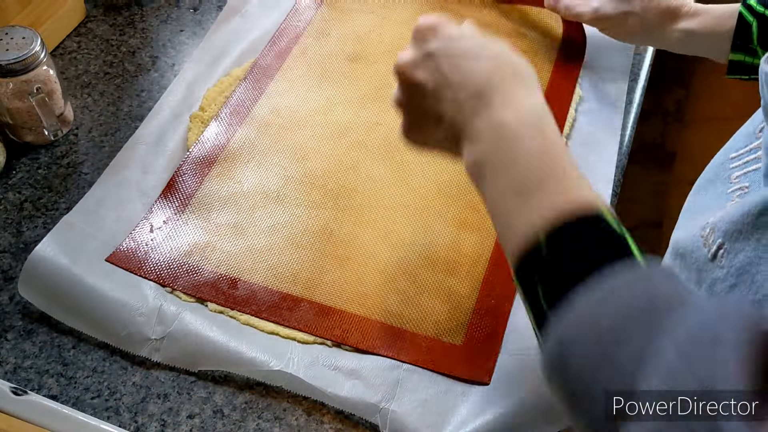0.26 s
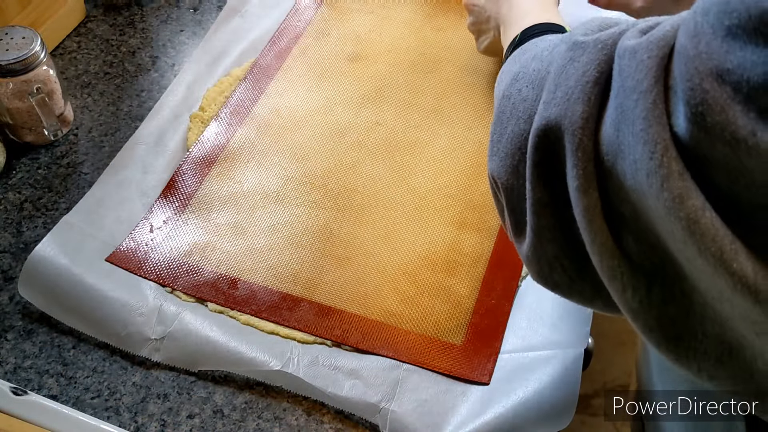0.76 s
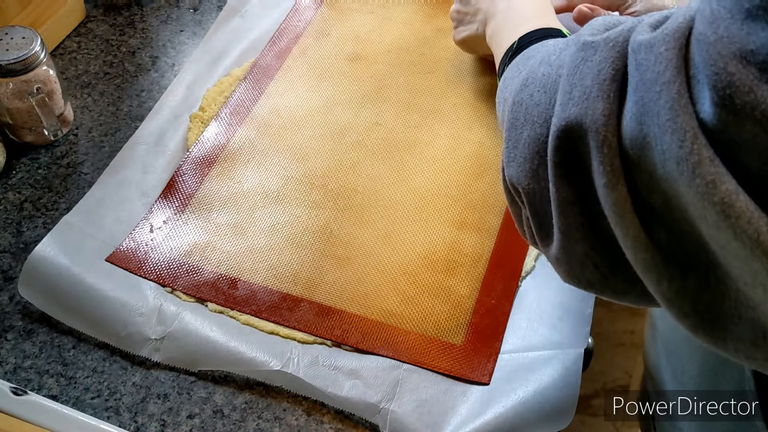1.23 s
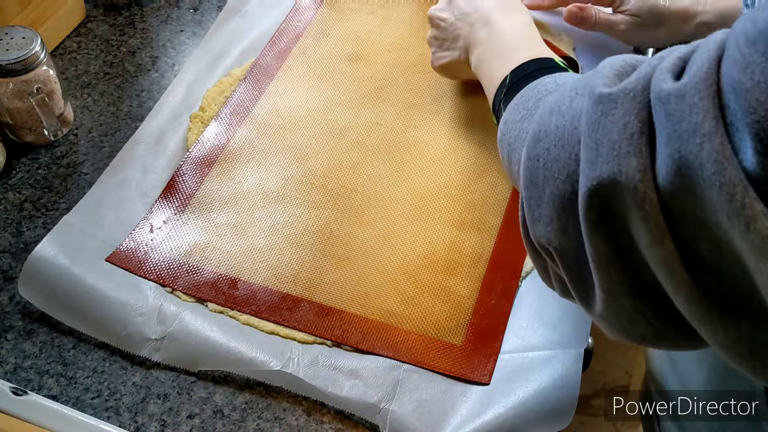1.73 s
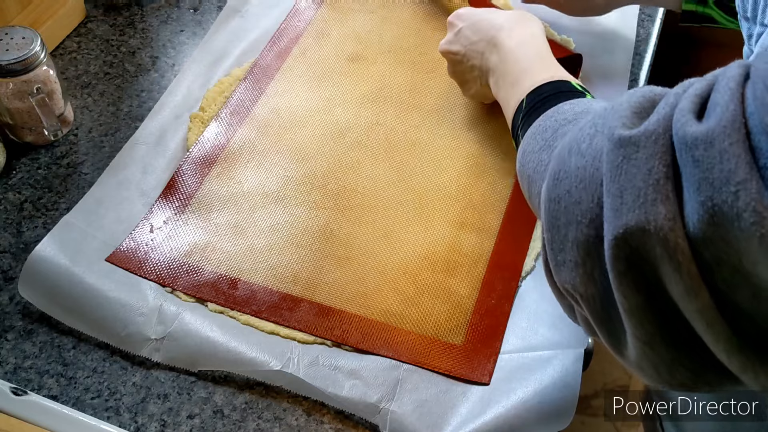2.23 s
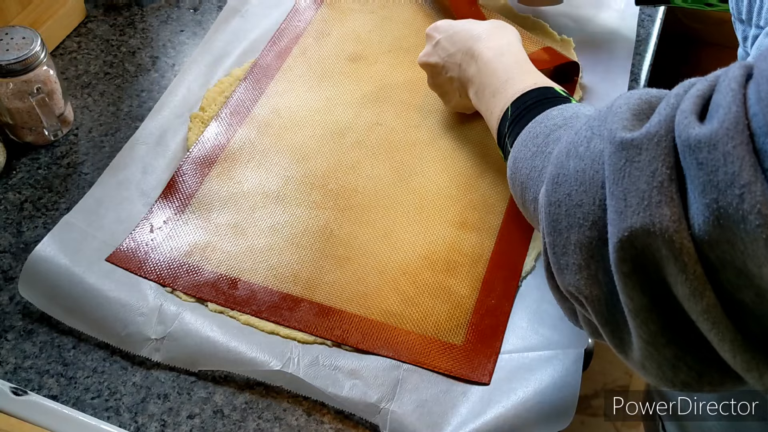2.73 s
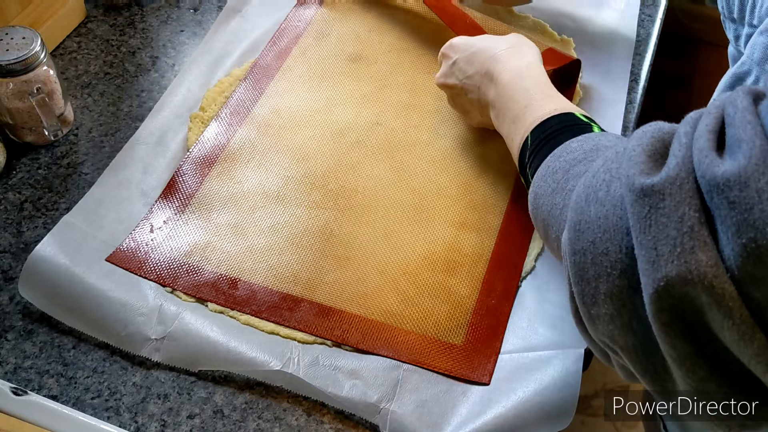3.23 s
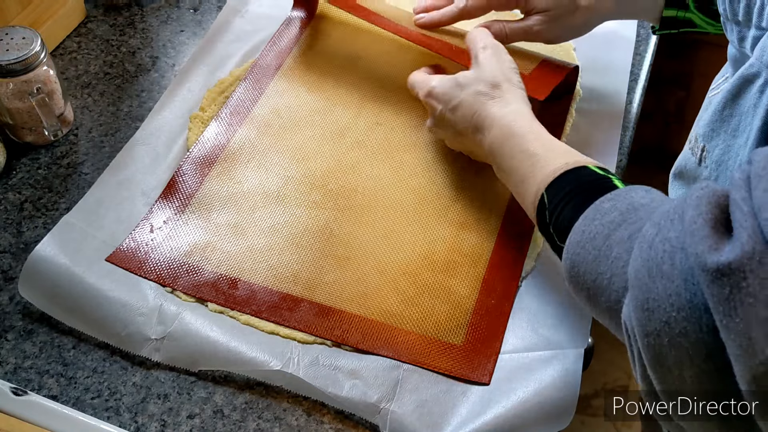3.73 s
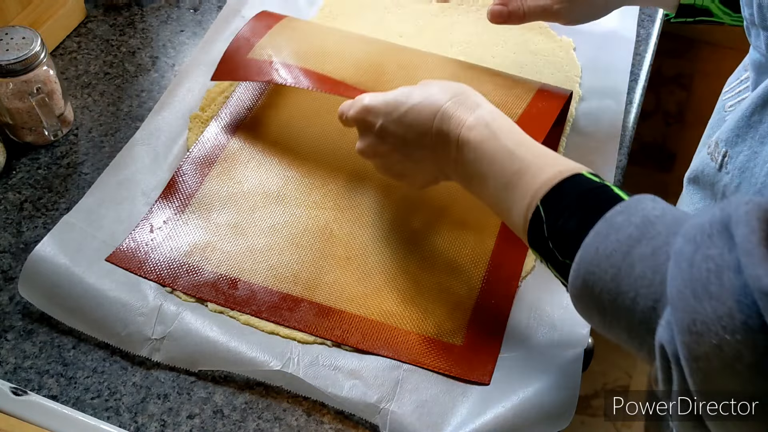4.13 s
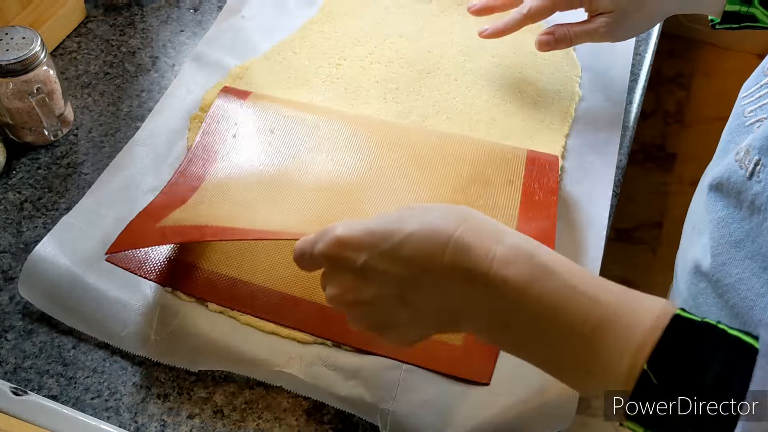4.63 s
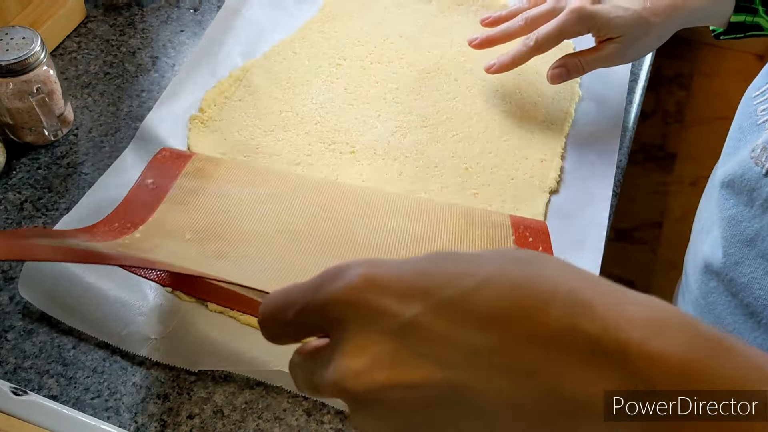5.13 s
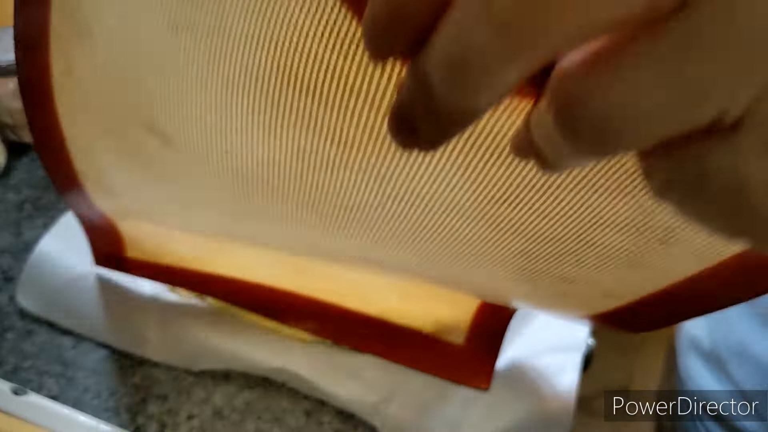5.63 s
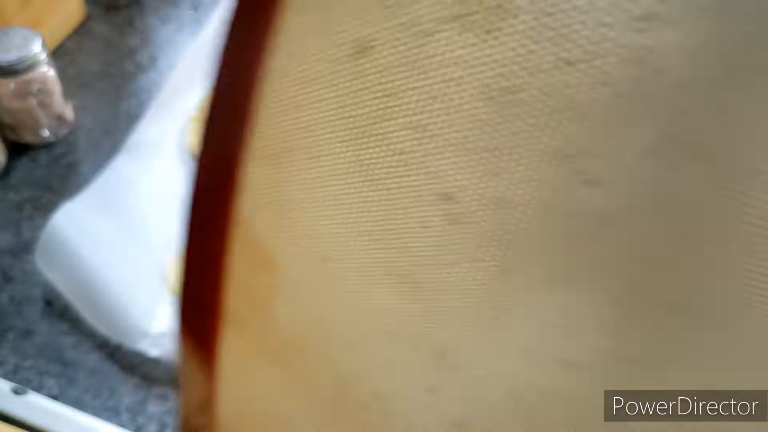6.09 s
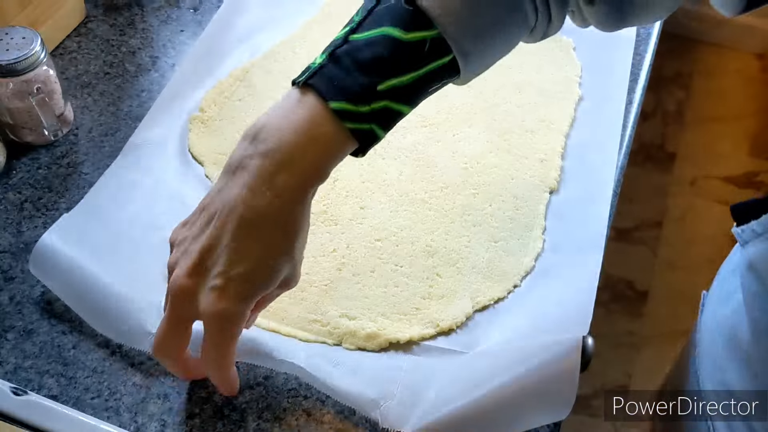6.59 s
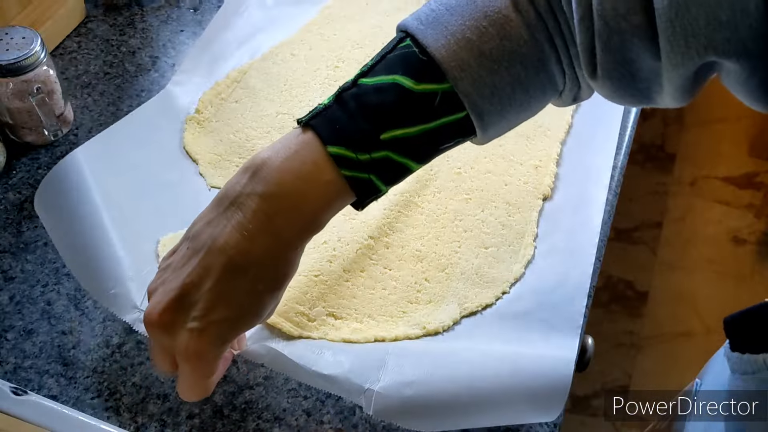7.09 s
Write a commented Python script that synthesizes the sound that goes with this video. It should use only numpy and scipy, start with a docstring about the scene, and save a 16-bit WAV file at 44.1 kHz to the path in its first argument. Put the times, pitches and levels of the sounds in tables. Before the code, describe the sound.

Over a soft appliance hum, paper crinkles, a small object clicks, a baking mat peels off dough and rips free, and parchment snaps sharply nearby.

```python
"""Peeling a baking mat off dough

A silicone mat is peeled off rolled dough on parchment, in a kitchen with a humming appliance.
The parchment rustles, scuffs and snaps: many small bursts of noise ring paper panels. The mat lets go
with a fizz of tiny clicks, and its last strip rips free with a rising pitch. A small hard object clicks once
and rings. Slow noise and low puffs are air wafted by the mat; hands on the counter are short low tones.
The appliance is steady tones with a wavering level, over filtered noise for its fan, rumble and hiss."""
import sys
import numpy as np
from scipy import signal
from scipy.fft import rfft, irfft
from scipy.io import wavfile

SR = 44100
rng = np.random.default_rng(int(sys.argv[2]) if len(sys.argv) > 2 else 0)


def generate_wav(sig):
    """Save sig (samples, or channels by samples) to the path in sys.argv[1] as 16-bit PCM at SR."""
    pcm = np.round(np.clip(np.atleast_2d(sig).T, -1, 1) * 32767).astype(np.int16)
    wavfile.write(sys.argv[1], SR, pcm)


N = 324121
TIME = np.arange(N) / SR

# Levels in the tables are starting levels: a layer may be trimmed, panned or given echoes afterwards.
# Parchment creases snapping as hand and mat tug at them:
# (time [s], peak level [dB], body level relative to the peak [dB], panel pitch [Hz])
SNAPS = [(0.02, -43.5, -0.5, 2630), (0.031, -43, -5, 3380), (0.0794, -24, -18.5, 1710),
         (0.083, -25.5, -13.5, 2800), (0.088, -30, -7.5, 1900), (0.097, -35, -10.5, 1510),
         (0.111, -33, -15.5, 3350), (0.126, -31, -10, 3220), (0.172, -37, -7.5, 2320),
         (0.2115, -34.5, -9.5, 1970), (0.225, -28, -11.5, 2630), (0.228, -41, -6.5, 1530),
         (0.351, -42.5, -6.5, 1730), (0.424, -52, -5.5, 2300), (0.450, -48.5, -7, 2200),
         (0.462, -48, -16, 3400), (0.520, -30, -12, 2750), (0.524, -39, -10, 1250),
         (0.532, -41, -10.5, 2500), (0.6944, -39, -9, 3000), (0.714, -45, -6, 2100),
         (0.745, -38.5, -12, 2050), (0.761, -46, -9.5, 1690), (0.8825, -33, -11.5, 2970),
         (0.885, -54, -20, 1720), (0.91, -49, -10, 3830), (1.582, -45, -9, 1720), (1.661, -43, -15, 1030),
         (2.125, -50, -4, 3200), (2.288, -41.5, -12, 2700), (2.362, -57.5, 0.5, 1730),
         (2.444, -54.5, -5.5, 1880), (2.463, -40, -11, 1880), (2.706, -49, -17.5, 1000),
         (2.973, -46.5, -6.5, 2300), (2.980, -41, -6.5, 2000), (3.1043, -39, -13.5, 2400),
         (3.158, -45, -12, 2570), (3.182, -40.5, -10, 2800), (3.195, -46.5, -7, 2730),
         (3.209, -42.5, -10, 2600), (3.23, -56, -9, 3020), (3.244, -41.5, -6.5, 2730),
         (3.260, -42.5, -6.5, 2340), (3.279, -47, -13, 3300), (3.408, -52, -5, 1800),
         (3.4145, -42, -11, 1170), (3.841, -49.5, -5, 1000), (4.2483, -34.5, -18.5, 1930),
         (4.268, -40, -15, 2400), (4.339, -48, -10, 3010), (4.437, -46.5, -9.5, 2270),
         (4.628, -46, -13.5, 2360), (4.739, -66, -10, 3100), (4.961, -53, -8, 2770),
         (4.991, -54, -11, 3900), (5.201, -59.5, -7.5, 2400), (5.272, -56.5, -9, 2200),
         (5.330, -46.5, -12, 4220), (5.475, -57, -7, 3250), (5.511, -48.5, -7, 2390),
         (5.675, -39, -24, 3000), (5.686, -23.5, -20, 2880), (5.687, -22, -19, 4300),
         (5.730, -35.5, -13, 3400), (5.751, -30.5, -21, 3500), (5.764, -31.5, -13.5, 3860),
         (5.817, -32.5, -10, 1100), (5.824, -29, -29, 1050), (5.840, -29.5, -11, 1200),
         (5.844, -23, -23.5, 1470), (5.854, -27, -8, 1540), (5.8712, -29, -14, 1540),
         (5.876, -29.5, -20, 3600), (5.893, -36, -10.5, 1550), (5.939, -41, -23, 3260),
         (5.948, -36.5, -16, 4500), (6.006, -31, -12, 2500), (6.0099, -26, -15.5, 2100),
         (6.012, -25, -24.5, 2520), (6.252, -59.5, -4, 2400), (6.673, -59, -5, 840), (6.786, -53, -8, 2320),
         (6.793, -44.5, -7, 2400), (6.840, -35, -23, 2400), (6.849, -35, -14, 2200),
         (6.8522, -27, -10, 2400), (6.869, -42, -5, 2400), (6.88, -36, -12, 2300),
         (6.8889, -31.5, -9.5, 2200), (6.8905, -16.5, -19.5, 1960), (6.896, -26.5, -9.5, 2200),
         (6.924, -27.5, -10, 3270), (6.936, -28, -12, 3500), (6.942, -28.5, -9.5, 2890),
         (6.9471, -25.5, -22.5, 4200), (6.9475, -23, -15, 2900), (6.9509, -19.5, -12.5, 2580),
         (6.956, -25, -7.5, 2670), (6.964, -21, -10, 1480), (6.9718, -37, -11, 2400),
         (6.983, -29, -8, 1120), (7.016, -48, -21, 3500), (7.038, -42.5, -18, 3500),
         (7.0457, -22, -15, 1700), (7.063, -32, -7.5, 3070), (7.078, -33, -11, 1750),
         (7.083, -37.5, -5, 960), (7.09, -28.5, -16.5, 1800), (7.1187, -22.5, -15.5, 1430),
         (7.126, -23.5, -16, 940), (7.175, -40, -8, 1810), (7.1938, -36, -11.5, 1490),
         (7.210, -47, -6, 1400), (7.2195, -31.5, -10.5, 1380), (7.225, -32.5, -14.5, 1580),
         (7.238, -22, -13, 1350), (7.247, -36, -8, 950), (7.343, -36.5, -5.5, 1370),
         (7.348, -58, -11, 1230)]
# Parchment sliding and flexing: (time [s], level [dB])
RUSTLE_LEVEL = [(0, -90), (.37, -73), (.8, -65.5), (1.05, -79), (1.76, -75.5), (2.5, -73), (2.99, -75),
                (3.17, -68), (3.95, -79.5), (4.42, -69), (5.25, -100), (5.55, -58.5), (5.85, -48),
                (6.04, -62), (6.15, -74), (6.62, -78), (6.79, -67.5), (7.35, -78)]
# Mat letting go of the dough: (time [s], level [dB])
PEEL_LEVEL = [(3.35, -86), (3.55, -72), (3.72, -70.5), (3.95, -82), (4.32, -70.5), (5.47, -67.5),
              (5.83, -55.5), (6.04, -57.5), (6.15, -76)]
# Air stirred by arm and mat: (time [s], level [dB])
WAFT_LEVEL = [(0, -78), (1.9, -82), (3.6, -73), (5.3, -72), (5.9, -72), (6.12, -64), (6.35, -66.5),
              (6.6, -71), (7.35, -67)]
# Hands landing on the counter: (time [s], level [dB], pitch [Hz], time to fade by 60 dB [s])
THUMPS = [(0.105, -53.5, 213, 0.45), (6.776, -41, 185, 0.048), (6.79, -34, 122, 0.059),
          (6.819, -40.5, 127, 0.13)]
# Contacts of the click, a light touch and then the snap: (time [s], level [dB])
CLICK_CONTACTS = [(2.144, -40), (2.153, -26), (2.154, -25), (2.157, -23.5), (2.160, -27)]
# What the click rings with: (pitch [Hz], width [Hz], level [dB])
CLICK_MODES = [(403, 160, -5), (1710, 120, -2.5), (2400, 150, -5.5), (2900, 240, -3.5), (3520, 300, -14),
               (4800, 1200, -5), (5900, 240, 0.5), (6200, 120, 0), (7150, 320, -1), (7470, 140, -10),
               (8880, 440, 1.5), (10200, 340, -12), (10400, 740, -21), (14400, 900, -17)]
# The hollow knock under the click, two close tones that beat:
# (pitch [Hz], level [dB], time to fade by 60 dB [s])
KNOCK_MODES = [(393, -55.5, 0.36), (425, -56, 0.3)]
# Strokes of paper flexing and scuffing: (middle time [s], length [s], level [dB], pitch [Hz])
SCUFFS = [(0.099, 0.2, -57.5, 1900), (0.556, 0.15, -63, 2130), (0.713, 0.043, -61, 2340),
          (0.901, 0.044, -59.5, 2900), (1.559, 0.057, -69.5, 1920), (2.99, 0.037, -71, 2170),
          (3.235, 0.081, -70, 2700), (3.417, 0.033, -70, 1700), (3.73, .055, -71.5, 2350),
          (3.854, 0.11, -72, 2000), (5.627, 0.051, -59, 2900), (5.871, 0.061, -47.5, 2960),
          (5.961, 0.07, -51.5, 4200), (6.006, 0.084, -50, 2570), (6.775, 0.063, -70.5, 2200),
          (6.895, 0.025, -37.5, 2210), (6.952, 0.02, -49, 2200), (7.088, 0.037, -52, 1560),
          (7.245, 0.044, -47.5, 1250)]
# The mat's last strip ripping free: (time [s], air pocket pitch [Hz], level [dB])
LAST_STRIP = [(5.77, 1000, -67), (5.82, 1090, -55), (5.85, 1450, -48.5), (5.885, 1580, -56),
              (5.92, 1650, -80)]
# Puffs as the mat flaps past the microphone: (middle time [s], level [dB], pitch [Hz])
PUFFS = [(6.089, -55.5, 103), (6.115, -52, 35), (6.168, -52.5, 50.3), (6.242, -57.5, 79), (6.3, -53, 28)]

# Spectra, of which only the shape counts, as each is scaled to keep the power of white noise.
# Dull body of a snap: (frequency [Hz], level [dB per Hz])
BODY_SPECTRUM = [(100, -27), (300, -6), (600, -9), (1200, -1), (1900, 4.5), (3600, -1.5), (5500, -10),
                 (9000, -31), (16000, -28)]
# Crisp crack of a snap, and the tick of the click: (frequency [Hz], level [dB per Hz])
CRACK_SPECTRUM = [(500, -39), (2000, -13), (4200, 3), (5800, -1.5), (7000, 4.5), (8100, -1), (9500, 3.5),
                  (11200, 2), (12800, -2), (14800, 1.5), (16500, -13)]
# Rustling paper: (frequency [Hz], level [dB per Hz])
PAPER_SPECTRUM = [(150, -38), (500, -12), (900, 3.5), (1500, 3.5), (2800, 4), (4300, 0.5), (5800, -5),
                  (7000, 0.5), (8100, -8.5), (10500, -7.5), (13000, -10), (15200, -29), (16200, -34)]
# Fizz of the mat letting go: (frequency [Hz], level [dB per Hz])
FIZZ_SPECTRUM = [(400, -6), (1500, -7.5), (4000, -10), (5800, -12.5), (7000, -7.5), (8000, -9), (9500, -2),
                 (11200, -1), (12700, -3), (15200, -1), (16000, -19)]
# Low rumble of the appliance: (frequency [Hz], level [dB per Hz])
RUMBLE_SPECTRUM = [(15, -17), (27, 6.5), (39, -9), (52, -21), (66, -16), (88, -3.5), (130, -4), (190, -3),
                   (240, -16.5), (1500, -64)]
# Whirr of the appliance's fan: (frequency [Hz], level [dB per Hz])
FAN_SPECTRUM = [(150, -21.5), (235, -10), (262, 0), (305, -1), (370, -1.5), (410, -10), (520, -3),
                (640, -8.5), (720, -11.5), (850, -16), (1500, -38), (5000, -66)]
# Faint even hiss: (frequency [Hz], level [dB per Hz])
HISS_SPECTRUM = [(530, -26), (900, -3), (1040, -3), (1200, -6), (1680, -12.5), (1850, -7), (1920, -13),
                 (5040, -13.5), (5610, -22), (7490, -29), (8250, -18), (11300, -3.5), (12900, -13.5),
                 (14900, -8.5), (16000, -19)]

# The motor's tones, as multiples of its turning rate: (multiple [no unit])
MOTOR_ORDERS = [3, 5, 6, 12, 15]
# Strength of each of those tones: (rms level [dB], left minus right [dB])
MOTOR_TONES = [(-72, 1), (-74, -6.5), (-70, -3), (-84, -13.5), (-91.5, -11)]
# Mains hum swelling: (time [s], rms level [dB])
MAINS_LEVEL = [(0, -77.5), (3.2, -79), (3.7, -70.5), (5.3, -80), (6.1, -70), (7.35, -65.5)]
# Resonances of the appliance's casing: (pitch [Hz], rough width [Hz], rms level [dB])
DRONES = [(91.6, 4.4, -73), (356.2, 19.4, -72.5)]
MAINS_HZ, MOTOR_HZ = 121.4, 55.7

# How the kitchen's echoes die away:
# (band centre [Hz], time to fade by 60 dB [s], left-right likeness [1 = same])
KITCHEN = [(246, 0.38, 1), (1230, 0.21, 0.07), (4000, 0.25, 0.016), (8850, 0.22, 0.078),
           (14500, 0.14, 0.066)]
# Treble of the snaps, shielded by the arm at first and open at the near corner; 0.5 is later
# taken off the gain that each level stands for: (time [s], level [dB])
TREBLE_LEVEL = [(0, -7), (.9, -3), (2.3, 1.5), (5.3, 7.5), (5.75, -7), (6.05, 3), (6.85, 2.5)]
TREBLE_HZ = 12200
# Direct sound of the snaps, as hands work from the far end towards the microphone: (time [s], level [dB])
NEARNESS_LEVEL = [(0, -2), (3.3, -3), (5.7, 1.5), (7.3, 2)]
# Damping of the paper panels, pressed flat at the far end and free at the near edge: (time [s], width [Hz])
PANEL_WIDTH = [(0.9, 900), (3.2, 550), (5.7, 330), (7.2, 280)]

# Small, high panels crack more crisply, creases with much body less; levels relative to the snap's peak
CRACK_DB, CRACK_DB_PER_OCTAVE, CRACK_PER_BODY_DB = -11.5, 3, -0.52
USUAL_PANEL_HZ, USUAL_BODY_DB = 2200, -8
PAPER_SIDE_DB = -1.5  # left minus right: the creases lie a little to the right
# The whole sheet flutters at this level under a stroke of this length, less under shorter ones
SHEET_HZ, SHEET_WIDTH_HZ, SHEET_DB, SHEET_STROKE_S = 200, 780, -3.5, 0.17
CUTOFF_HZ = 15800


def from_db(db):
    """Turn decibels into a gain."""
    return 10 ** (np.asarray(db) / 20)


def rms_one(x):
    """Scale a sound to an rms level of 1."""
    return x / np.sqrt(np.mean(x ** 2) + 1e-20)


def level_curve(rows):
    """Gain over time from rows of (time [s], level [dB])."""
    return from_db(np.interp(TIME, *np.transpose(rows)))


def at_hz(points, hz):
    """Read a spectrum at any frequency, along straight lines on a log-frequency scale."""
    points_hz, points_db = np.transpose(points)
    return np.interp(np.log(np.maximum(hz, 1)), np.log(points_hz), points_db)


def pan(db):
    """Gains for left and right that differ by this many dB."""
    return from_db(np.array([[db], [-db]]) / 2)


def add(track, s, sound):
    """Mix a short sound into a track at a time in seconds."""
    start = max(round(s * SR), 0)
    stretch = track[..., start:start + sound.shape[-1]]
    stretch += sound[..., :stretch.shape[-1]]


def drift(rate):
    """Slow random wandering with rms 1; a higher rate [Hz] wanders faster."""
    step = 40  # samples between the points that are drawn
    r = np.exp(-2 * step * np.pi * rate / SR)
    white = rng.standard_normal(N // step + 2002)
    slow = signal.lfilter([1], [1, -2 * r, r * r], white)[2000:]
    return np.interp(np.arange(N) / step, np.arange(len(slow)), rms_one(slow))


def colour(x, spectrum, size=2048):
    """Filter to a given spectrum without ringing ahead (minimum phase); white noise keeps its power."""
    gain = rms_one(from_db(at_hz(spectrum, np.arange(size // 2 + 1) * SR / size)))
    cepstrum = irfft(np.log(gain))
    cepstrum[1:size // 2] *= 2
    cepstrum[size // 2 + 1:] = 0
    response = irfft(np.exp(rfft(cepstrum)))
    return signal.oaconvolve(x, response[None], axes=-1)[:, :N]


def resonate(x, hz, width_hz):
    """Let a sound ring at one pitch, with gain 1 at the peak; a narrower width rings longer."""
    r = np.exp(-np.pi * width_hz / SR)
    feed = np.array([1, 0, -1]) * (1 - r * r) / 2
    feedback = [1, -2 * r * np.cos(2 * np.pi * hz / SR), r * r]
    return signal.lfilter(feed, feedback, x + 1e-18)


def stereo_noise(alike, count=N):
    """White noise whose two sides are partly the same (1 = fully)."""
    mid, side = rng.standard_normal((2, count))
    alike = np.clip(alike, -1, 1)
    return np.sqrt((1 + alike) / 2) * mid + np.sqrt((1 - alike) / 2) * side * [[1], [-1]]


def burst(decay_s, alike, scatter_db, scatter_s, count=2048):
    """A brief rattle of fibres, with the energy of 1 ms at level 1, and its quick scatter off counter and body."""
    t = np.arange(count) / SR
    rattle = np.tanh(2 * stereo_noise(alike, count)) * t * np.exp(-t / decay_s)
    scatter_shape = (1 - np.exp(-t / (2 * decay_s))) * np.exp(-t / scatter_s)
    scatter = stereo_noise(alike / 2, count) * scatter_shape
    return (rms_one(rattle) + from_db(scatter_db) * rms_one(scatter)) * np.sqrt(SR / 1000 / count)


def grains(per_s, spread_db, clump_db, clump_rate, alike):
    """Tiny clicks of uneven size, louder and softer in clumps; rms 1."""
    born = rng.random(N) < per_s / SR
    size_db = spread_db * np.minimum(rng.exponential(1, N), 4) + clump_db * drift(clump_rate)
    return rms_one(born * from_db(size_db) * np.tanh(2 * stereo_noise(alike)))


def panels(clicks, low_hz, high_hz, sharpness, count=12):
    """Every click rings one of many paper panels, each at a pitch of its own."""
    dealt = rng.integers(0, count, N)
    pitches = np.geomspace(low_hz, min(high_hz, .4 * SR), count)
    ringing = 0
    for k, hz in enumerate(pitches):
        boost = np.sqrt(sharpness * SR / (np.pi * hz))
        ringing = ringing + resonate(clicks * (dealt == k), hz, hz / sharpness) * boost
    return ringing


def kitchen(x, tail_db, count=20000):
    """The direct sound and a diffuse tail of echoes that dies at its own speed in each band."""
    t, hz = np.arange(count) / SR, np.arange(count // 2 + 1) * SR / count
    tail, centres = 0, np.array(KITCHEN)[:, 0]
    for (_, t60, alike), own in zip(KITCHEN, np.eye(len(KITCHEN))):
        band = np.sqrt(np.interp(hz, centres, own))
        tail = tail + irfft(rfft(stereo_noise(alike, count)) * band) * from_db(-60 * t / t60)
    late_tail = tail * (t > .002)  # echoes start after 2 ms
    echoes = from_db(tail_db) * rms_one(late_tail) / np.sqrt(count)
    return x + signal.fftconvolve(x, echoes, axes=-1)[:, :N]


def room_air(rumble_db, fan_db, hiss_db, rumble_follows):
    """The appliance's fan whirrs with a faint even hiss; its rumble grows with the mains hum."""
    load = rms_one(level_curve(MAINS_LEVEL) ** rumble_follows)
    rumble = from_db(rumble_db) * load * colour(stereo_noise(0.74), RUMBLE_SPECTRUM, size=8192)
    fan = from_db(fan_db) * colour(stereo_noise(0.46), FAN_SPECTRUM) * pan(-1.4)
    hiss = from_db(hiss_db) * colour(stereo_noise(0.023), HISS_SPECTRUM) * pan(-6.5)
    return rumble + fan + hiss


def hum(waver_db, waver_rate, wander_hz):
    """A running appliance: tones of one motor that flutter in strength, a droning casing, and mains hum."""
    waver = from_db(waver_db * drift(waver_rate))
    out = level_curve(MAINS_LEVEL) * waver * np.sqrt(2) * np.sin(2 * np.pi * MAINS_HZ * TIME)
    turns = np.cumsum(MOTOR_HZ + wander_hz * drift(8.0)) / SR
    for order, (db, side_db) in zip(MOTOR_ORDERS, MOTOR_TONES):
        gain = pan(side_db) * from_db(db + waver_db * drift(waver_rate))
        out = out + gain * np.sqrt(2) * np.sin(2 * np.pi * (order * turns + rng.random()))
    for hz, width_hz, db in DRONES:
        once = resonate(stereo_noise(1.0), hz, 2 * width_hz)
        out = out + from_db(db) * rms_one(resonate(once, hz, 2 * width_hz))
    return out


def waft(puff_s):
    """Slow lumps of air reach the microphone, with a few distinct puffs as the mat flaps past."""
    # (frequency [Hz], level [dB per Hz])
    spectrum = [(12, -34), (30, 10), (70, 2.0), (130, -9.0), (300, -50), (1500, -57)]
    air = level_curve(WAFT_LEVEL) * colour(stereo_noise(0.85), spectrum, size=8192)
    t = np.arange(-(SR // 8), SR // 8) / SR
    for s, db, hz in PUFFS:
        swell = from_db(db) * np.exp(-(t / puff_s) ** 2)
        add(air, s + t[0], swell * np.sin(2 * np.pi * (hz * t + rng.random())))
    return air


def thumps(rise_s):
    """The soft hand pushes the counter into a short low ring."""
    out, t = np.zeros((2, N)), np.arange(SR // 4) / SR
    for s, db, hz, t60 in THUMPS:
        fade = from_db(db - 60 * t / t60)
        add(out, s, fade * (1 - np.exp(-t / rise_s)) * np.sin(2 * np.pi * hz * t))
    return out


def knock(count=16384):
    """The click's hollow body swells and throbs as its two low tones beat."""
    out, t = np.zeros((2, N)), np.arange(count) / SR
    snap_s = CLICK_CONTACTS[2][0]
    for k, (hz, db, t60) in enumerate(KNOCK_MODES):
        # opposite signs: the two tones cancel at the start
        add(out, snap_s, (-1) ** k * from_db(db - 60 * t / t60) * np.sin(2 * np.pi * hz * t))
    return out


def click(ring_db, tick_db, lag_s):
    """A few contacts within milliseconds set a small hard object ringing, off to the left."""
    contacts = np.zeros((2, N))
    for s, db in CLICK_CONTACTS:
        add(contacts, s, from_db(db) * burst(0.00057, alike=0.22, scatter_db=0.0, scatter_s=0.028))
    contacts[1] = np.roll(contacts[1], round(lag_s * SR))  # the right side hears it later
    ring = 0
    for k, (hz, width_hz, db) in enumerate(CLICK_MODES):
        ring = ring + (-1) ** k * from_db(db) * resonate(contacts, hz, width_hz)
    return from_db(ring_db) * ring + from_db(tick_db) * colour(contacts, CRACK_SPECTRUM)


def rustle(level_db):
    """Countless small creases give way as the parchment moves."""
    crinkle = grains(per_s=700, spread_db=2.5, clump_db=1.5, clump_rate=49, alike=0.16)
    return from_db(level_db) * colour(crinkle * level_curve(RUSTLE_LEVEL), PAPER_SPECTRUM) * pan(-0.17)


def scuffs(level_db, relative_width, grit_db):
    """Quick stick and slip shakes a patch of paper at its own pitch; long strokes set the whole sheet fluttering."""
    out = np.zeros((2, N))
    slips = grains(per_s=1700, spread_db=2.5, clump_db=2.5, clump_rate=130, alike=0.61)
    for s, length_s, db, hz in SCUFFS:
        start = max(round((s - length_s / 2) * SR), 0)
        stroke = slips[:, start:start + round(length_s * SR)]
        stroke = rms_one(stroke * np.hanning(stroke.shape[1]))
        width_hz = relative_width * hz
        patch = rms_one(resonate(resonate(stroke, hz, width_hz), hz, width_hz))
        flutter = rms_one(resonate(stroke, SHEET_HZ, SHEET_WIDTH_HZ))
        sheet = from_db(SHEET_DB) * (length_s / SHEET_STROKE_S) ** 2 * flutter
        add(out, start / SR, from_db(db) * (patch + sheet + from_db(grit_db) * stroke))
    return from_db(level_db) * out * pan(-1.5)


def crackles(level_db, ring_db, build_s, settle_s, count=4096):
    """Around each snap, smaller creases give way as the strain builds and settles."""
    t = (np.arange(count) - count // 4) / SR
    swell = np.exp(np.where(t < 0, t / build_s, -t / settle_s))
    strain = np.zeros(N)
    for s, peak_db, body_db, _ in SNAPS:
        add(strain, max(s + t[0], 0), from_db(peak_db + body_db) * swell)
    creases = strain * grains(per_s=500, spread_db=1.5, clump_db=0.5, clump_rate=26, alike=0.72)
    crinkle = from_db(level_db) * colour(creases, PAPER_SPECTRUM)
    ringing = from_db(ring_db) * panels(creases, low_hz=868, high_hz=4200, sharpness=23)
    return (crinkle + ringing) * pan(-2.0)


def snaps(body_db, crack_db, panel_db, pluck_db, yield_s, spike_db, hardening):
    """A crease flips with a crack and plucks the paper panel beside it, which rings for a few cycles."""
    body, crack, panel = np.zeros((3, 2, N))
    for s, peak_db, low_db, hz in SNAPS:
        gain = from_db(peak_db) * pan(PAPER_SIDE_DB)
        high_db = CRACK_DB + CRACK_DB_PER_OCTAVE * np.log2(hz / USUAL_PANEL_HZ)
        high_db += CRACK_PER_BODY_DB * (low_db - USUAL_BODY_DB)
        flip_s = yield_s * from_db(low_db)  # creases with much body give way slowly, thin ones at once
        flip = gain * from_db(low_db) * burst(flip_s, alike=0.52, scatter_db=-4.5, scatter_s=0.0075)
        add(body, s, flip)
        width_hz = np.interp(s, *np.transpose(PANEL_WIDTH))
        push = from_db(panel_db) * flip
        add(push, 3 * flip_s, gain * from_db(low_db + pluck_db))  # the pluck: a single sample
        add(panel, s, resonate(push, hz, width_hz) * np.sqrt(SR / (np.pi * width_hz)))
        fibres = burst(flip_s, alike=0.046, scatter_db=-1, scatter_s=0.0039)
        add(crack, s, gain * from_db(high_db) * fibres)
        stop = gain * from_db(spike_db + hardening * peak_db)  # the harder the flip, the sharper it stops
        add(crack, s + 3 * flip_s, stop)
    dull = from_db(body_db) * colour(body, BODY_SPECTRUM)
    crisp = from_db(crack_db) * colour(crack, CRACK_SPECTRUM)
    return dull + crisp + panel


def shade(x):
    """Arm and mat stand between paper and microphone and change how much of the top gets through."""
    high_pass = signal.butter(1, min(TREBLE_HZ, .45 * SR), "high", fs=SR, output="sos")
    top = signal.sosfilt(high_pass, x)
    return x + (level_curve(TREBLE_LEVEL) - 1.5) * top


def fold(width_hz, level_db):
    """The mat's last strip rips free; the air pocket under it shortens and its resonance climbs."""
    s, hz, db = np.transpose(LAST_STRIP)
    ripping = grains(per_s=1800, spread_db=6.0, clump_db=2.5, clump_rate=62, alike=0.9)
    # shift the moving pitch down to 0 Hz, filter there, and shift back up
    turn = np.exp(2j * np.pi * np.cumsum(np.interp(TIME, s, hz)) / SR)
    low_pass = signal.butter(2, width_hz / 2, fs=SR, output="sos")
    pocket = signal.sosfilt(low_pass, ripping / turn + 1e-18) * turn
    strip_db = np.interp(TIME, s, db, left=-np.inf, right=-np.inf)  # silent outside the rip
    return from_db(level_db + strip_db) * rms_one(pocket.real) * pan(-3.1)


def peel(level_db, tack_db):
    """The mat's weave lets go of the dough cell by cell; stickier spots part with a tiny tick."""
    cells = grains(per_s=7000, spread_db=4.0, clump_db=3.0, clump_rate=190, alike=0.11)
    fizz = colour(cells, FIZZ_SPECTRUM)
    tacks = grains(per_s=190, spread_db=2.5, clump_db=1.5, clump_rate=40, alike=0.3)
    ticks = panels(tacks, low_hz=1000, high_hz=4050, sharpness=7.1)
    first_s, last_s = PEEL_LEVEL[0][0], PEEL_LEVEL[-1][0]
    peeling = np.interp(TIME, [first_s - .1, first_s, last_s - .1, last_s], [0, 1, 1, 0])
    both = from_db(level_db) * fizz + from_db(tack_db) * ticks
    return both * level_curve(PEEL_LEVEL) * peeling * pan(-1.3)


def scene():
    """Mix the paper and mat, the click, the hands, the stirred air and the appliance."""
    creases = snaps(body_db=-1.5, crack_db=-0.5, panel_db=-1.5, pluck_db=9,
                    yield_s=0.0034, spike_db=-10.0, hardening=0.97)
    creases = shade(creases + crackles(level_db=-16, ring_db=-20, build_s=0.0057, settle_s=0.0068))
    sliding = rustle(level_db=-4.0) + scuffs(level_db=-3.0, relative_width=1.0, grit_db=-5.5)
    sliding += peel(level_db=1.0, tack_db=-8.0)
    sliding += fold(width_hz=320, level_db=-0.5)
    # nearness changes the direct sound only, not the echoes
    near_creases = kitchen(creases, tail_db=-3.0) + (level_curve(NEARNESS_LEVEL) - 1) * creases
    paper = near_creases + kitchen(sliding, tail_db=-1.0)
    clicked = kitchen(click(ring_db=2.0, tick_db=-7.0, lag_s=0.00036), tail_db=-6.0) + knock()
    appliance = hum(waver_db=2.3, waver_rate=5.8, wander_hz=0.3)
    appliance = appliance + room_air(rumble_db=-69.5, fan_db=-69.5, hiss_db=-76, rumble_follows=0.15)
    return paper + clicked + thumps(rise_s=0.0028) + waft(puff_s=0.02) + appliance


def record(dry):
    """Cut the top steeply above the cutoff."""
    low_pass = signal.ellip(10, .2, 80, CUTOFF_HZ, fs=SR, output="sos")
    return signal.sosfilt(low_pass, dry)


dry = scene()
out = record(dry)
generate_wav(out)
```